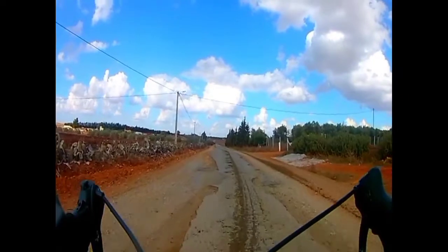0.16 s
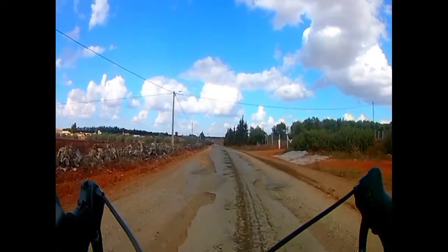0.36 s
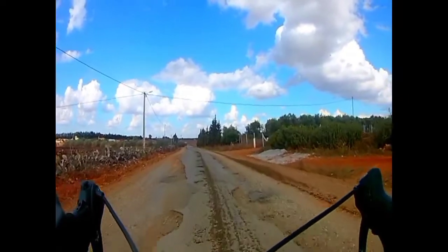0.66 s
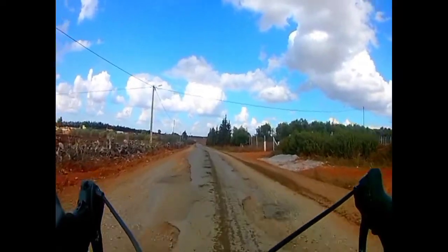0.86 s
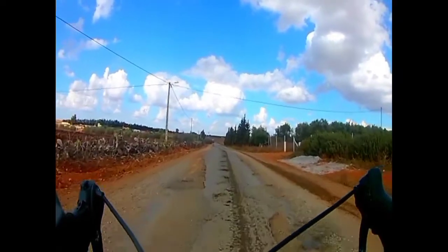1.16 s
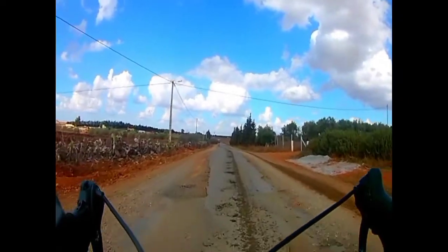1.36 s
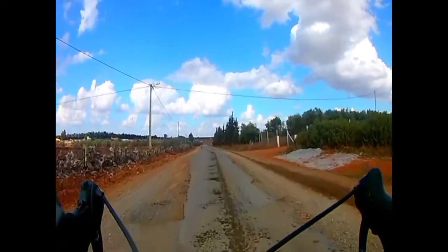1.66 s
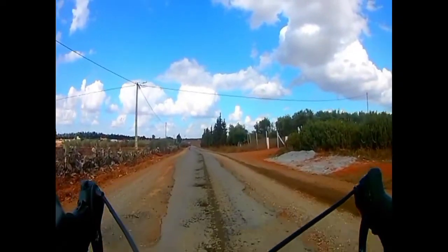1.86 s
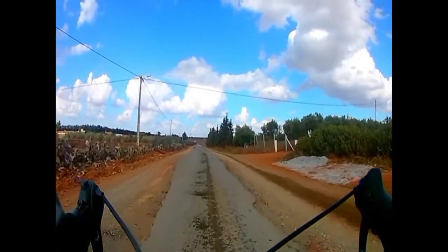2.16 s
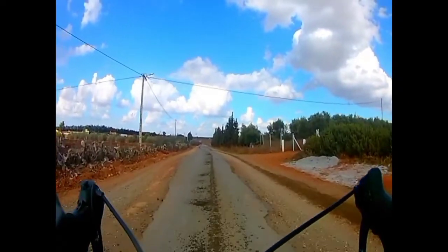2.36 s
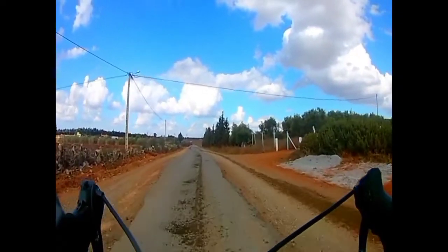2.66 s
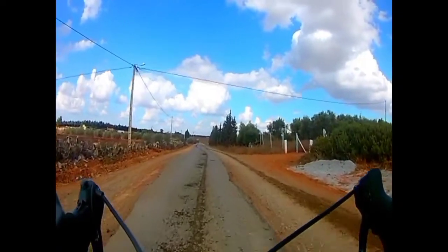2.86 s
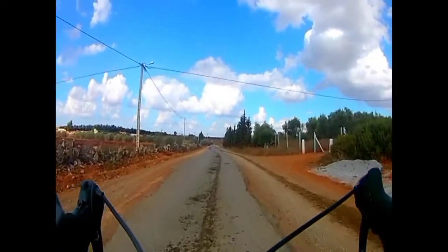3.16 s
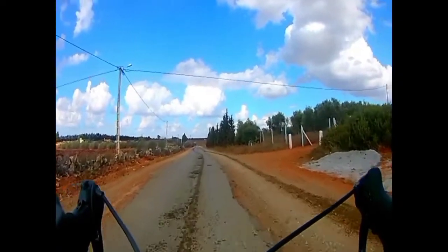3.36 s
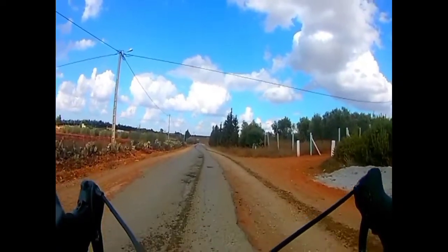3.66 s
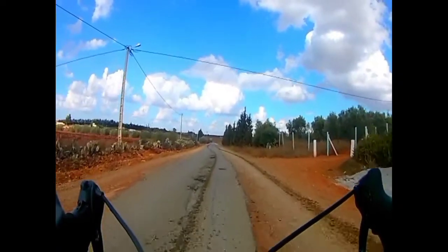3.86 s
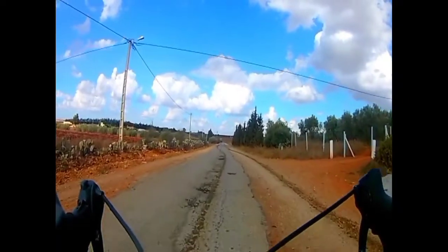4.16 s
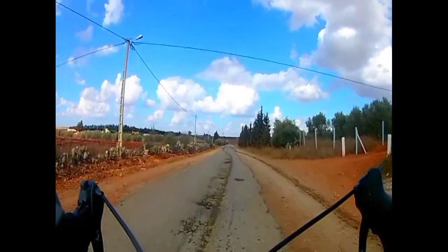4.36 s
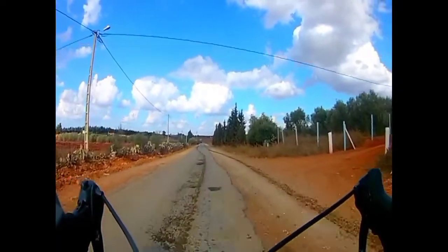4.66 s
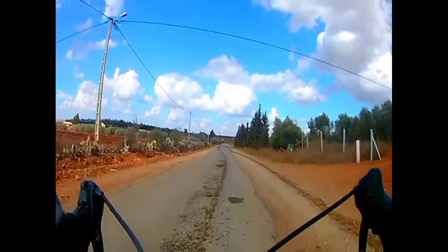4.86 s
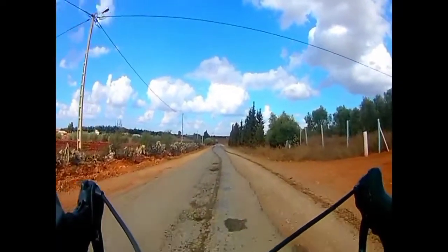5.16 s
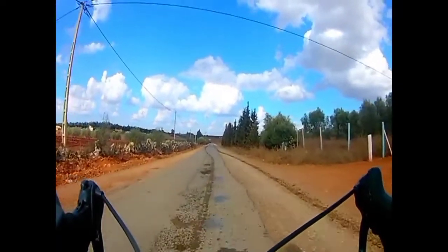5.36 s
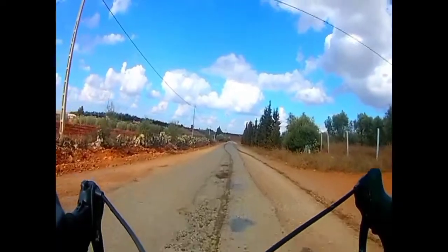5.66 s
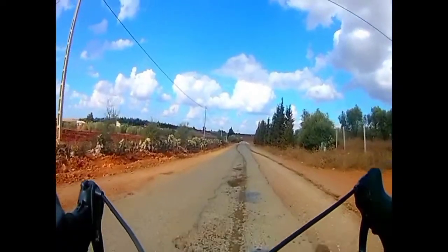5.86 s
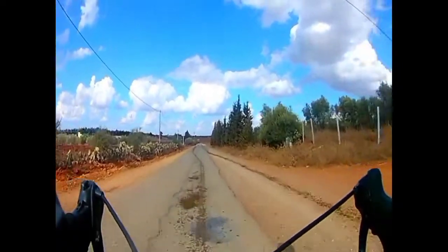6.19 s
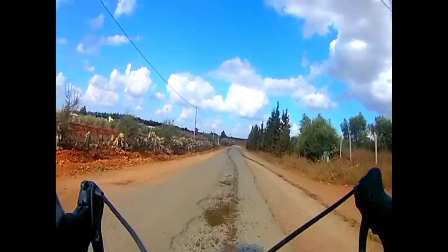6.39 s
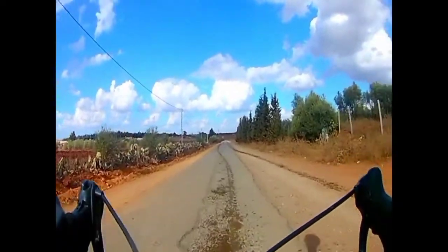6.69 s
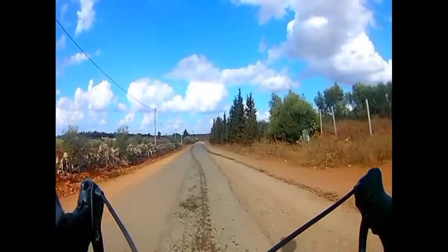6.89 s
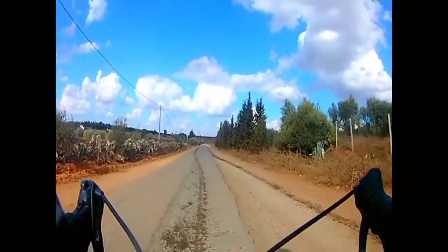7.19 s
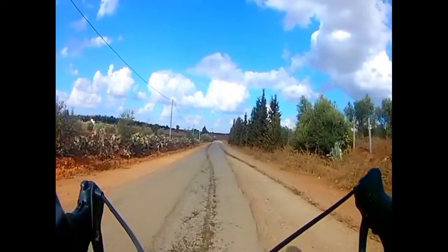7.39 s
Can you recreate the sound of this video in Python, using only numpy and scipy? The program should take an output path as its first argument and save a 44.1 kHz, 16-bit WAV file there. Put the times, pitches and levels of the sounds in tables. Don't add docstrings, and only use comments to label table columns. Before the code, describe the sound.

Close, muffled and bass-heavy: the handlebar shudders in uneven bursts while wind thuds against the microphone case. Tyre grit crackles beneath, the rear hub ticks softly and a spoke gives rare thin pings. It begins fairly restrained, then grows rougher after about three seconds, with clacks, dull stone knocks and slightly overloaded jolts outdoors on broken asphalt.

```python
import sys
import numpy as np
from scipy import signal
from scipy.fft import rfft, irfft
from scipy.io import wavfile
from scipy.ndimage import uniform_filter1d

SR = 44100
rng = np.random.default_rng(int(sys.argv[2]) if len(sys.argv) > 2 else 0)


def amplitude_ratio(level_db):
    exponent = np.asarray(level_db, float) / 20
    return 10 ** exponent


def generate_wav(sig):
    pcm = np.round(np.clip(np.atleast_2d(sig).T, -1, 1) * 32767).astype(np.int16)
    wavfile.write(sys.argv[1], SR, pcm)


N = 332073


def evened(x):
    return x / np.sqrt(np.mean(x ** 2) + 1e-20)


def columns(rows):
    s, *values = np.transpose(rows)
    return [np.interp(np.arange(N) / SR, s, v) for v in values]


def add(mix, s, sound):
    part = mix[round(s * SR):][:len(sound)]
    part += sound[:len(part)]


def gain_at(points, hz):
    f, db = np.transpose(points)
    return amplitude_ratio(np.interp(np.log(hz + 1), np.log(f + 1), db, left=-90, right=-90))


def coloured(points):
    spectrum = rfft(rng.standard_normal(N))
    return evened(irfft(spectrum * gain_at(points, np.fft.rfftfreq(N, 1 / SR)), N))


def resonate(x, hz, width_hz):
    pole = np.exp((2j * hz - width_hz) * np.pi / SR)
    return signal.lfilter([(1 - abs(pole)) ** 2], np.poly([pole, pole]), x)


def lumps(hz, depth_db):
    return amplitude_ratio(depth_db * evened(resonate(rng.standard_normal(N), 0, hz).real))


def ring(t, hz, t60):
    return amplitude_ratio(-60 * t / t60) * np.sin(2 * np.pi * hz * t)


# (time [s], swing [dB], width [s])
BUMPS = [(0.401, -19, 0.11), (0.731, -21, 0.19), (0.968, -21, 0.18), (1.169, -20.5, 0.035),
         (1.431, -20.5, 0.077), (1.502, -21.5, 0.112), (1.639, -20.5, 0.1), (1.783, -17.5, 0.042),
         (1.935, -16.5, 0.045), (2.046, -21, 0.13), (2.29, -22, 0.2), (2.458, -19, 0.044),
         (2.858, -17.5, 0.028), (3.039, -15, 0.046), (3.329, -17, 0.23), (3.474, -13, 0.056),
         (3.747, -17.5, 0.045), (4.05, -18, 0.096), (4.27, -13, 0.15), (4.471, -14, 0.08),
         (4.573, -13.5, 0.055), (4.933, -19, 0.036), (5.072, -12.5, 0.042), (5.24, -16.5, 0.096),
         (5.438, -16.5, 0.067), (5.893, -16.5, 0.13), (6.183, -14.5, 0.14), (6.535, -14.5, 0.097),
         (7.194, -14, 0.055), (7.388, -17, 0.128)]


def swing_level():
    t = np.arange(N) / SR
    throb = lumps(26.8, 4)
    sway_db = columns(ROAD)[1] + 7
    power = (amplitude_ratio(sway_db) * lumps(8.1, 3.0) * throb) ** 2
    for s, db, width_s in BUMPS:
        swell = np.exp(-(2.0 * (t - s) / width_s) ** 2)
        power = power * (1 - swell) + (amplitude_ratio(db) * swell * throb ** 0.35) ** 2
    return 10 * np.log10(power)


def handlebar(swing_db):
    bar_hz, bar_width_hz = 112.2, 22.7
    slap_angle = 1.1
    z = resonate(rng.standard_normal(N), bar_hz, bar_width_hz)
    size = abs(z) / np.sqrt(np.mean(abs(z) ** 2))
    at = np.round(np.sort(np.array(SLAPS)[:, 0]) * SR).astype(int)
    shift = np.interp(np.arange(N), at, np.unwrap(slap_angle - np.angle(z[at])))
    steadied = evened(size / (size + .5)) * np.sqrt(2)
    swing = amplitude_ratio(swing_db) * steadied * np.exp(1j * (np.angle(z) + shift))
    skew = amplitude_ratio(-3) * (swing ** 2).imag
    return swing.real + skew


def body(modes, level_db, unevenness):
    drive = rng.standard_normal(N) * unevenness
    total = np.zeros(N)
    for hz, width_hz, db in modes:
        once = resonate(drive, hz, width_hz)
        total += amplitude_ratio(db) * resonate(once, hz, 2.56 * width_hz).real
    return amplitude_ratio(level_db) * evened(total)


# (time [s], wind gust [dB], road roughness [dB])
ROAD = [(0.0, -36, -34), (0.86, -29.5, -36), (1.3, -34.5, -37), (3.42, -28, -31), (3.46, -22.5, -32),
        (3.86, -33.5, -31), (4.26, -29, -30.5), (4.76, -33, -32.5), (5.16, -29, -31), (5.51, -33, -33.5),
        (5.73, -24, -29.5), (6.04, -32.5, -33.5), (6.31, -20.5, -28.5), (6.42, -41.5, -35.5),
        (6.5, -29, -30), (7.26, -34.5, -33), (7.38, -23.5, -33), (7.53, -40, -30.5)]
# (frequency [Hz], density [dB per Hz])
BUFFET = [(8.8, -33.5), (15, -10), (38, 1.5), (65, -4.5), (78, 0.5), (100, -20), (170, -120)]
# (frequency [Hz], width [Hz], level [dB])
CASE = [(164.5, 108.4, 3.5), (253.1, 168, -1.5), (367.9, 199, -2), (417, 118.5, -2.5), (471, 167, 0),
        (605.5, 252, -4.5), (753.7, 116.3, 0), (809.4, 130, -8)]
# (frequency [Hz], width [Hz], level [dB])
GRIT = [(1228, 450, 3.5), (1396, 420, 6.5), (1707, 39, 8), (2200, 610, -12.5)]
# (frequency [Hz], width [Hz], level [dB])
FIZZ = [(2510, 160, -14), (3070, 470, -15.5), (3405, 260, -7.5), (3696, 400, -7), (4040, 240, -3.5),
        (5100, 900, -23), (5370, 300, -24.5), (6370, 250, -26.5)]


def road(swing_db):
    wind_db, rough_db = columns(ROAD)
    buzz_db, grit_db = rough_db + 1.5, 1.073 * rough_db - 13
    jolt_db = swing_db + 20
    bumps = lumps(45, 1.7)
    wind = amplitude_ratio(wind_db + 0.097 * jolt_db) * coloured(BUFFET) * lumps(6.9, 2.0)
    buzz = body(CASE, buzz_db + 0.23 * jolt_db, bumps ** 0.81 * lumps(80, 0.88))
    grit = body(GRIT, grit_db + 0.16 * jolt_db, bumps ** 1.2 * lumps(130, 2.9))
    fizz = body(FIZZ, 0.7 * grit_db - 30.5 + 0.069 * jolt_db, bumps ** 1.5 * lumps(61, 3.6))
    return wind + buzz + grit + fizz


def gravel():
    grains_per_s, spread_db, over_road_db = 70, 4.0, -8.5
    size = amplitude_ratio(spread_db * np.minimum(rng.exponential(size=N), 4))
    taps = size * (rng.random(N) < grains_per_s / SR)
    modes, out = CASE[2:] + GRIT[:2], np.zeros(N)
    which = rng.integers(0, len(modes), N)
    for k, (hz, width_hz, _) in enumerate(modes):
        rung = evened(resonate(taps * (which == k), hz, 1.2 * width_hz).imag)
        out += amplitude_ratio(-7.0 * np.log2(hz / 500)) * rung
    return amplitude_ratio(columns(ROAD)[1] + over_road_db) * evened(out)


# (first time [s], last time [s], ticks [count], level [dB])
PAWLS = [(0.034, 0.739, 12, -58.5), (0.061, 0.718, 11, -68.5), (0.778, 1.499, 12, -61.5),
         (0.819, 1.526, 12, -62), (1.583, 2.244, 11, -62.5), (1.625, 2.275, 11, -63.5),
         (2.328, 2.948, 12, -60.5), (2.349, 2.977, 12, -62.5), (3.081, 3.741, 12, -56.5),
         (3.109, 3.784, 12, -60), (3.837, 4.53, 13, -59.5), (3.854, 4.507, 12, -61.0),
         (4.565, 5.011, 11, -64), (4.594, 5.02, 11, -64), (5.059, 5.618, 14, -64), (5.076, 5.647, 14, -64),
         (5.665, 6.137, 10, -65), (5.694, 6.107, 9, -60.5), (6.181, 6.632, 11, -66),
         (6.193, 6.642, 11, -59.5), (6.658, 7.092, 9, -64), (6.67, 7.077, 8, -56.5), (7.142, 7.519, 9, -59),
         (7.156, 7.508, 8, -65.5)]


def pawl_ticks():
    s = np.concatenate([np.linspace(a, b, round(n)) for a, b, n, _ in PAWLS])
    db = np.concatenate([np.full(round(n), db) for _, _, n, db in PAWLS])
    late_s = .001 * rng.standard_normal(len(s))
    soft_db = 3 * rng.exponential(size=len(s)) ** 2
    loaded = (s > 2.3) & (s < 4.55)
    return list(zip(s + late_s, db - soft_db - 4.0 * loaded, 14 * loaded))


# (time [s], level [dB])
JARS = [(2.414, -58), (2.7243, -63), (3.044, -39.5), (3.179, -62.5), (3.436, -61), (3.467, -45.5),
        (4.0066, -63), (5.443, -42.5), (5.7726, -52), (6.1853, -43.5), (7.384, -53)]
HUB_HZ = [1450, 2640, 3610, 3880, 4150, 4700, 5680, 6250, 6430, 6800, 7430, 8560]
# (level [dB], t60 [s])
HUB = [(18.5, 0.025), (5, 0.019), (9.5, 0.012), (14, 0.011), (4.5, 0.025), (-9.5, 0.037), (-4, 0.012),
       (-4, 0.0055), (-2.5, 0.014), (-10, 0.028), (-11, 0.017), (-3, 0.011)]


def freewheel():
    out, t = np.zeros(N), np.arange(1200) / SR
    hz = np.array(HUB_HZ)[:, None]
    hub_db, t60 = np.transpose(HUB)[..., None]
    rattle = np.sin(np.pi * np.minimum(t[:500] / .008, 1)) * amplitude_ratio(-60 * t[:500] / 0.018)
    ringing = ring(t, hz, t60) * (1 - np.exp(-(t / 0.0013) ** 2))
    rows = [(s, db - 2.0, 0) for s, db in JARS] + pawl_ticks()
    for s, db, muffle_db in rows:
        noise, share_db = rng.standard_normal(500), rng.standard_normal((len(HUB), 1))
        modes = signal.fftconvolve(ringing, (rattle * noise)[None], axes=1)
        modes /= abs(modes).max(1, keepdims=True)
        modes *= amplitude_ratio(hub_db + share_db - muffle_db * (hz > 5000))
        add(out, s - .0015, amplitude_ratio(db) * modes.sum(0))
    return out


# (time [s], level [dB])
PINGS = [
    (0.1301, -67),
    (0.617, -71.5),
    (1.5973, -64),
    (2.578, -66),
    (3.5069, -62),
    (3.9449, -66),
    (4.3494, -71),
    (4.7606, -64.5),
    (5.1544, -78.5),
    (6.7744, -76),
]


def spoke():
    out, t = np.zeros(N), np.arange(4000) / SR
    ping = ring(t, 5230, 0.062) * np.minimum(t / .004, 1)
    for s, db in PINGS:
        add(out, s, amplitude_ratio(db + 5) * ping)
    return out


# (time [s], bright level [dB], dull level [dB])
KNOCKS = [(0.425, -36, -22), (0.4903, -24.5, -34), (0.8411, -25, -26.5), (1.6305, -30, -34),
          (2.4086, -22, -22.5), (2.724, -30.5, -24), (3.0399, -19, -24.5), (3.202, -21.5, -20),
          (3.5059, -22, -17), (3.5638, -26.5, -41), (3.746, -28.5, -39), (4.002, -28, -33),
          (4.2617, -23.5, -25), (4.31, -27.5, -19), (4.3291, -30, -24), (4.721, -26.5, -19.5),
          (5.0411, -25, -12.5), (5.1062, -24, -35.5), (5.1263, -30, -26), (5.2779, -27, -27.5),
          (5.4389, -18, -33.5), (5.6546, -25.5, -25.5), (5.972, -31, -25.5), (5.9944, -24, -47.5),
          (6.107, -26.5, -20.5), (6.1831, -15, -24.5), (6.576, -23.5, -33.5), (6.7211, -24, -26.5),
          (6.7486, -34, -20.5), (7.3382, -20.5, -26)]


def knocks():
    out, t = np.zeros(N), np.arange(1200) / SR
    envelope = amplitude_ratio(-60 * t / 0.037) * np.minimum(t / 0.00063, 1)
    for s, bright_db, dull_db in KNOCKS:
        scrape = uniform_filter1d(rng.standard_normal(len(t)), size=12)
        blow = uniform_filter1d(scrape, size=10) * envelope
        bright = (resonate(blow, 1440, 310) + .5 * resonate(blow, 750, 420)).real
        dull = (resonate(blow, 580, 310) + 0.1 * resonate(blow, 340, 200)).real
        add(out, s, amplitude_ratio(bright_db - 1.5) * bright / abs(bright).max())
        add(out, s, amplitude_ratio(dull_db + 1.5) * dull / abs(dull).max())
    return out


# (time [s], crack [dB], thump [dB])
SLAPS = [(1.6323, -63, -19.5), (1.907, -55.5, -22), (2.6349, -33, -12.5), (3.0378, -38.5, -34),
         (3.38, -39.5, -16), (3.4432, -43.5, -33.5), (3.4676, -32.5, -11.5), (3.4765, -24.5, -12),
         (3.5686, -53.5, -23), (4.0457, -47, -20.5), (4.2547, -40.5, -32), (4.2729, -32.5, -20.5),
         (4.2822, -25.5, -28.5), (4.4768, -33, -19), (4.5715, -38, -17), (5.0642, -32.5, -26.5),
         (5.0729, -32, -29.5), (5.237, -28, -10.5), (5.658, -37, -30), (5.7114, -30.5, -9),
         (5.7453, -33, -11.5), (5.8895, -32, -26), (6.128, -34, -23.5), (6.1754, -31, -30.5),
         (6.2889, -35, -13), (6.534, -34, -17.5), (6.5533, -35, -9.5), (7.1866, -30.5, -18),
         (7.3853, -26.5, -5.5), (7.4104, -34, -25)]
# (time [s], crack [dB], thump [dB])
REBOUNDS = [(3.033, -26.5, -28), (3.0432, -22.5, -17), (3.4701, -32.5, -21.5), (3.488, -42, -19.5),
            (5.0405, -33.5, -34), (5.7377, -58.5, -18), (5.9056, -42.5, -25.5), (5.9397, -47, -27.5),
            (6.212, -41.5, -21), (6.2565, -51, -34), (6.7165, -43, -22), (7.3662, -48, -18.5),
            (7.3992, -39.5, -22)]
# (frequency [Hz], gain [dB])
CRACK = [(350, -4.5), (900, 18), (2600, 4), (4400, 9.5), (5500, 1), (7200, -17), (9500, -10), (15000, -14)]


def slaps():
    out, t = np.zeros(N), np.arange(2048) / SR
    colour = gain_at(CRACK, np.fft.rfftfreq(len(t), 1 / SR))
    fade = (amplitude_ratio(-60 * t / .005) + amplitude_ratio(-34 - 60 * t / .03)) * np.minimum(t / 0.00019, 1)
    onset = 1 - np.exp(-(t / 0.0012) ** 2)
    rows = [(*r, -1) for r in SLAPS] + [(*r, 1) for r in REBOUNDS]
    for s, crack_db, thump_db, sign in rows:
        noise = rng.standard_normal(len(t))
        strike = sign * 2.5 * (np.arange(len(t)) == 20)
        crack = irfft(rfft(np.roll(strike + noise * fade, 80)) * colour)
        clamp = ring(t, 1963, .011) + 1.8 * ring(t, 1300 * (1 + 0.1 * noise[1]), 0.012)
        thump = ring(t, 300 * (1 + 0.57 * noise[0]), 0.0077) + 0.26 * ring(t, 720, 0.015)
        push = amplitude_ratio(crack_db + 8.5) * clamp + sign * amplitude_ratio(thump_db + 10.5) * thump
        add(out, s - 60 / SR, amplitude_ratio(crack_db + 8) * crack / abs(crack).max())
        add(out, s + 0.00029, onset * push)
    return out


def scene():
    swing_db = swing_level()
    mix = handlebar(swing_db) + road(swing_db) + gravel()
    mix += freewheel() + spoke() + knocks() + slaps()
    return (mix * signal.windows.tukey(N, .002))[None]


# (frequency [Hz], gain [dB])
HOUSING = [(1, -1.5), (6900, -3), (7600, -7.5), (8100, -19.5), (8600, -14.5), (10000, -21), (14000, -24),
           (22000, -51)]


def sealed_housing(dry):
    mirrored = np.concatenate([dry, dry[:, ::-1]], axis=1)
    gain = gain_at(HOUSING, np.fft.rfftfreq(2 * N, 1 / SR))
    return irfft(rfft(mirrored) * gain)[:, :N]


# (frequency [Hz], density [dB per Hz])
HISS = [(3000, -1.5), (6000, -2), (8000, -4.5), (12000, -5.5), (15700, -3.5)]


def circuit_hiss():
    return amplitude_ratio(-81.5) * coloured(HISS)


def low_pass(x):
    return signal.sosfilt(signal.butter(12, 15630, fs=SR, output="sos"), x)


def record(dry):
    overloaded = 1.777 * np.tanh(sealed_housing(dry) / 1.298)
    finished = overloaded + circuit_hiss()
    return low_pass(finished)


dry = scene()
out = record(dry)
generate_wav(out)
```